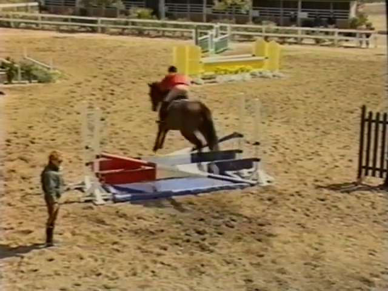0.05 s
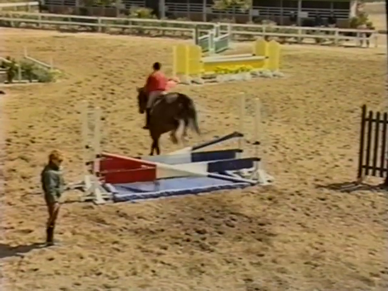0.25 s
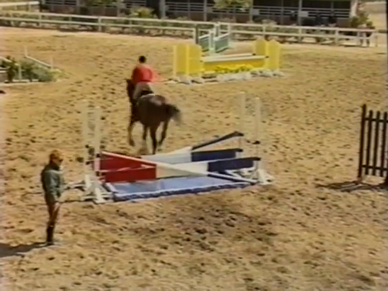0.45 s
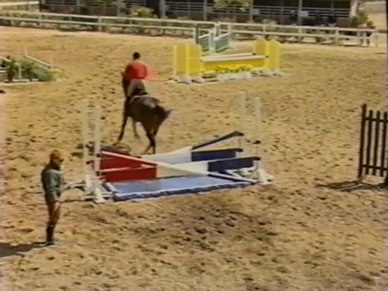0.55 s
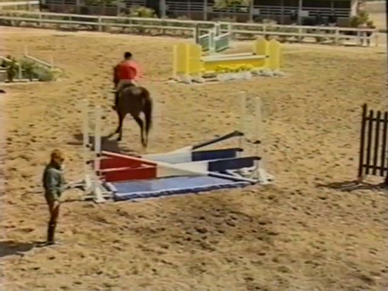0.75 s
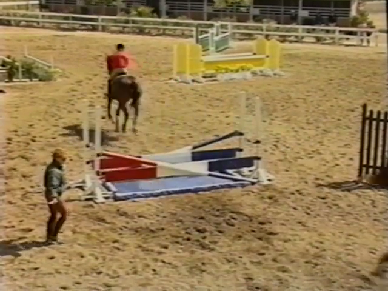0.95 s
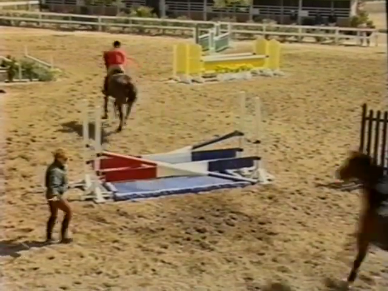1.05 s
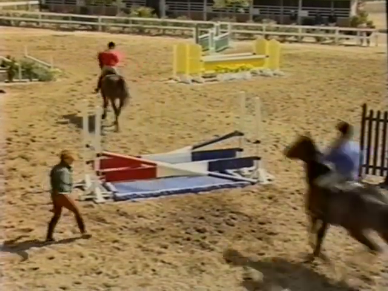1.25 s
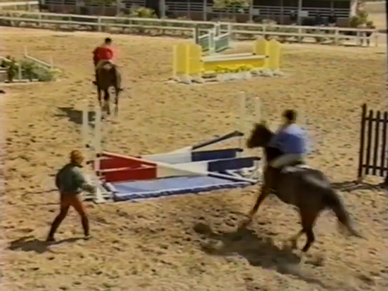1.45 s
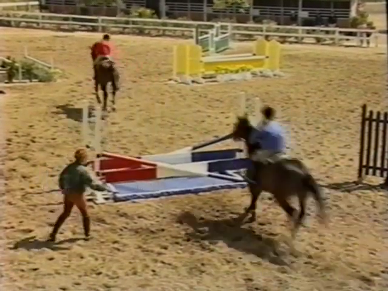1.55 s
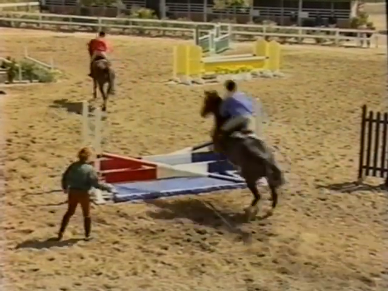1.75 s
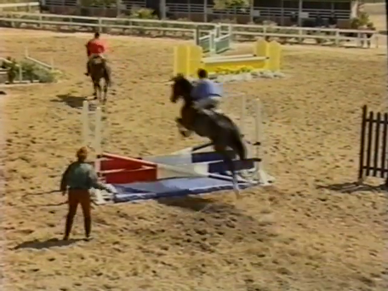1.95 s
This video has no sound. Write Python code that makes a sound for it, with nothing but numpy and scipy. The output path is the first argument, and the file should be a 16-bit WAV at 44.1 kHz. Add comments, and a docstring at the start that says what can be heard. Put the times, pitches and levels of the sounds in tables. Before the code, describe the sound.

Muffled hoofbeats on deep sand, landing and fading, then a closer, heavier canter in light wind

```python
"""Two horses on a sand arena: one lands from a jump and canters away, the other canters in close and takes off.
From the start, sand gives way in runs of dull filtered pops, over coloured-noise wind, rustle and hiss
and a thin whine of two sines. Then hooves knock and weight thumps as short decaying sine swings, while
filtered clicks make grit ticks, crust cracks and bright grains, and pops make crunches. Later, kicked-up
sand rains down twice as sparse filtered noise. The sound is almost mono."""
import sys
import numpy as np
from scipy import signal
from scipy.fft import rfft, irfft, next_fast_len
from scipy.io import wavfile

SR = 44100
rng = np.random.default_rng(int(sys.argv[2]) if len(sys.argv) > 2 else 0)


def master(y):
    """Save y as 16-bit WAV."""
    cut = np.clip(np.atleast_2d(y).T, -1, 1)
    pcm = np.round(cut * 32767)  # scale
    wavfile.write(sys.argv[1], SR, pcm.astype(np.int16))


N = 88376  # samples

# tone of the packed sand: f/Hz, density/dB per Hz (relative)
SAND_TONE = [(18, -52), (35, -7.5), (58, -3.5), (100, 4), (200, 4), (380, -2.5), (650, -12.5), (900, -28),
             (1500, -46), (3000, -69), (8000, -97.5)]
# tone of the breaking crust: f/Hz, density/dB per Hz (relative)
CRUST_TONE = [(300, -8.5), (600, -1), (920, -4.5), (1400, -22), (3000, -45), (9000, -78.5)]
# tone of bright sand grains: f/Hz, density/dB per Hz (relative)
GRAIN_COLOUR = [(1000, -21), (3000, 1), (6000, 0), (11000, -5), (15000, -15)]
# a hoof or a clod knocks on the firm base: t/s at its loudest, peak level/dB, pitch f/Hz
KNOCK_EVENTS = [(0.202, -17, 340), (0.28, -28.5, 217), (0.396, -25, 239), (0.441, -30, 204),
                (0.535, -21.5, 175), (0.588, -21.5, 290), (0.6273, -17.5, 279), (0.647, -24, 284),
                (0.663, -23, 307), (0.776, -25.5, 266), (0.795, -23, 183), (0.933, -26.5, 260),
                (0.946, -28, 250), (0.974, -34, 192), (1.195, -32, 225), (1.315, -24.5, 208),
                (1.361, -30, 190), (1.395, -22.5, 246), (1.447, -26, 197), (1.470, -21, 310),
                (1.501, -18, 347), (1.51, -26, 377), (1.538, -15, 187), (1.568, -15, 254),
                (1.626, -26, 326), (1.641, -20.5, 253), (1.713, -15, 270), (1.724, -20, 372),
                (1.738, -30, 266), (1.749, -14, 154), (1.763, -22.5, 248), (1.775, -22, 184),
                (1.80, -15.5, 354), (1.817, -19, 260), (1.856, -15.5, 178), (1.863, -20, 235),
                (1.888, -24.5, 296), (1.927, -15, 294), (1.984, -21.5, 248)]


def from_db(db):
    """Decibels to an amplitude factor."""
    return 10 ** (np.asarray(db) / 20)


def rms_one(x):
    """Scale to an rms of 1."""
    return x / np.sqrt(np.mean(x ** 2) + 1e-20)


def add(out, s, sound):
    """Mix a sound in at a time in seconds, cut at the end of the scene."""
    start = max(int(s * SR), 0)
    out[start:start + len(sound)] += sound[:max(N - start, 0)]


def coloured(x, spectrum, tilt_db=0):
    """Causal (minimum-phase) filter that follows a spectrum, tilted in dB per octave."""
    size = 2 * next_fast_len(len(x))
    bin_hz = np.arange(size // 2 + 1) * SR / size
    octave = np.log2(np.maximum(bin_hz, 1))
    hz, db = np.transpose(spectrum)
    tilted_db = db + tilt_db * np.log2(hz / hz[0])
    shape_db = np.interp(octave, np.log2(hz), tilted_db)
    # folding the cepstrum onto positive time makes the filter minimum-phase
    cepstrum = irfft(np.log(from_db(shape_db)))
    cepstrum[1:size // 2] *= 2
    cepstrum[size // 2 + 1:] = 0
    response = np.exp(rfft(cepstrum))
    return irfft(rfft(x, size) * response)[:len(x)]


def noise(spectrum):
    """Steady coloured noise with an rms of 1, its filter already run in."""
    white = rng.standard_normal(N + SR // 10)
    return rms_one(coloured(white, spectrum)[-N:])


def pops(size, rate):
    """Clicks at random moments, of uneven strength and either sign; rate is per second."""
    spread_db = 1
    born = (rng.random(size) < rate / SR) * rng.choice([-1, 1], size)
    return born * from_db(spread_db * np.clip(rng.standard_normal(size), -2, 2))


def presses(rows, tone, rate, settle_s):
    """Sand gives way in uneven pops while the hoof presses, then settles exponentially."""
    rise_s = 0.0025
    out = np.zeros(N)
    t = np.arange(SR // 5) / SR
    for s, length, db, *tilt_db in rows:
        onset = np.minimum(t / rise_s, 1)
        settling = np.exp(-np.maximum(t - length, 0) / settle_s)
        weight = onset * settling
        sand = rms_one(coloured(pops(len(t), rate) * weight, tone, *tilt_db))
        # the level is that under full weight, so longer presses carry more energy
        add(out, s, from_db(db) * np.sqrt(np.mean(weight ** 2)) * sand)
    return out


def blows(rows, cycles):
    """A blow cushioned by sand: a sine swing, widest after the given cycles, that soon dies away."""
    out = np.zeros(N)
    t = np.arange(SR // 10) / SR
    for s, db, hz in rows:
        age = hz * t / cycles
        envelope = (age * np.exp(-age)) ** 3
        swing = np.sin(2 * np.pi * hz * t) * envelope
        # starts early, so the envelope peaks at the listed time
        add(out, s - cycles / hz, from_db(db) * swing / np.abs(swing).max())
    return out


def clicks(rows, tone):
    """Filtered impulses: each row gives a time in seconds and a peak level in dB."""
    out = np.zeros(N)
    click = coloured(signal.unit_impulse(SR // 20), tone)
    click /= np.abs(click).max()
    for s, db in rows:
        add(out, s, from_db(db) * click)
    return out


def footfalls():
    """Deep sand gives way under each hoof in a short run of dull pops."""
    # footfalls: t/s, length/s, level/dB, brightness tilt/dB per octave
    footfall_events = [(0.0, 0.056, -40.5, -3.5), (0.103, 0.02, -35, -4.5), (0.212, 0.021, -30.5, -1.5),
                       (0.298, 0.044, -37.5, -3), (0.478, 0.058, -34.5, -5), (0.573, 0.023, -28, -2),
                       (0.613, 0.048, -27.5, -.5), (0.675, 0.07, -43, 0), (0.773, 0.036, -29.5, -0.5),
                       (0.92, 0.075, -34, -2), (1.01, 0.11, -43.5, -2.5), (1.185, 0.02, -39.5, -2),
                       (1.309, 0.039, -36.5, -3), (1.412, 0.025, -28.5, -3.5), (1.443, 0.053, -28.5, 2.4),
                       (1.49, 0.028, -23.5, 3), (1.535, 0.061, -27, -0.5), (1.61, 0.055, -27.5, 1.5),
                       (1.718, 0.034, -26, 4.5), (1.764, 0.035, -25, 1.5), (1.808, 0.057, -29, 1.5),
                       (1.886, 0.023, -29, -.5), (1.913, 0.064, -30, -0.5)]
    return presses(footfall_events, SAND_TONE, rate=480, settle_s=0.011)


def patter():
    """Far hooves and falling clods: small dull pops at random between the footfalls."""
    level_db, pops_per_s, tilt_db_per_octave = -44, 110, -1.5
    dull_pops = coloured(pops(N, pops_per_s), SAND_TONE, tilt_db_per_octave)
    return from_db(level_db) * rms_one(dull_pops)


def wind():
    """Light wind: low coloured noise that rises and lulls."""
    # wind tone: f/Hz, density/dB per Hz (relative)
    wind_tone = [(18, -45), (32, -38), (52, 11), (100, 4.5), (200, -16), (400, -15), (800, -16.5),
                 (1300, -31), (3000, -62.5)]
    # rise and lull of the wind: t/s, level/dB
    wind_level = [(0, -40.5), (.33, -42), (.4, -42.5), (.66, -42), (.86, -42), (1.24, -46), (1.55, -38),
                  (2, -39)]
    level_db = np.interp(np.arange(N) / SR, *np.transpose(wind_level))
    return from_db(level_db) * noise(wind_tone)


def rustle():
    """A soft rustle, as of thrown sand: faint noise with a narrow-band swell after the landing."""
    # rustle tone: f/Hz, density/dB per Hz (relative)
    rustle_tone = [(500, 3), (1000, 6), (1800, 4.5), (2400, 0.5), (3000, 1.5), (4200, -5), (8000, -12)]
    # course of the rustle: t/s, level/dB
    rustle_level = [(0, -65), (.4, -68), (.7, -65), (.95, -68), (1.25, -68.5), (1.6, -68.5), (2, -68.5)]
    # narrow tone of the swell: f/Hz, density/dB per Hz (relative)
    swell_tone = [(1000, -26), (1780, 1), (3000, -26), (6000, -45)]
    swell_at_s, swell_width_s, swell_db = 0.69, 0.15, -71.5
    t = np.arange(N) / SR
    level_db = np.interp(t, *np.transpose(rustle_level))
    bell = np.exp(-((t - swell_at_s) / swell_width_s) ** 2)
    swell = from_db(swell_db) * bell * noise(swell_tone)
    return from_db(level_db) * noise(rustle_tone) + swell


def hiss():
    """Steady coloured noise in the centre, plus faint white noise of opposite sign left and right."""
    # hiss tone: f/Hz, density/dB per Hz (relative)
    hiss_tone = [(200, 8.5), (2000, -2), (5000, 3.5), (7200, 8), (9000, 3), (15500, 1)]
    centre_db, side_db = -74.5, -90.5
    side = from_db(side_db) * rng.standard_normal(N) * np.array([[1], [-1]])
    return from_db(centre_db) * noise(hiss_tone) + side


def whine():
    """A thin electrical whine of steady, very high sines."""
    # whine partials: f/Hz, rms level/dB
    whine_partials = [(13980, -89), (15735, -87)]
    t = np.arange(N) / SR
    return sum(np.sqrt(2) * from_db(db) * np.sin(2 * np.pi * hz * t) for hz, db in whine_partials)


def knocks():
    """Hooves and clods strike the firm base, a short pitched swing for each."""
    return blows(KNOCK_EVENTS, cycles=0.683)


def crust_cracks():
    """The crust cracks at each knock: a filtered click well under the knock's peak."""
    under_knock_db = -17.5
    return clicks([(s, db + under_knock_db) for s, db, hz in KNOCK_EVENTS], CRUST_TONE)


def grit_ticks():
    """Grit against a shoe: single dry clicks."""
    # grit ticks: t/s, peak level/dB
    tick_events = [(0.2, -52), (0.626, -36.5), (1.47, -45), (1.5, -39), (1.535, -37.5), (1.711, -42.5),
                   (1.746, -39), (1.759, -41.5), (1.799, -40), (1.855, -38.5), (1.927, -41)]
    # tone of a tick: f/Hz, density/dB per Hz (relative)
    tick_tone = [(300, -2.5), (1000, 19.5), (1800, 14), (3500, -2.5), (7000, -14.5), (15000, -28)]
    return clicks(tick_events, tick_tone)


def thumps():
    """The weight of the horse comes down: the ground swings low for a cycle or two."""
    # thumps: t/s at the loudest, peak level/dB, pitch f/Hz
    thump_events = [(0.228, -26.5, 75), (0.635, -23.5, 64), (0.805, -19.5, 115), (1.55, -24, 91),
                    (1.63, -29.5, 93), (1.76, -26, 77.3)]
    return blows(thump_events, cycles=0.84)


def crunches():
    """The crust crunches under the hoof: short runs of finer, denser pops."""
    # crunches: t/s, length/s, level/dB
    crunch_events = [(0.217, 0.019, -45), (0.586, 0.0087, -47), (0.643, 0.009, -50), (0.791, 0.0025, -40),
                     (1.496, 0.02, -36), (1.534, 0.0033, -35.5), (1.564, 0.023, -39),
                     (1.634, 0.0044, -35.5), (1.721, 0.026, -39.5), (1.765, .055, -41.5)]
    return presses(crunch_events, CRUST_TONE, rate=1800, settle_s=0.0068)


def bright_grains():
    """Single grains: clicks finer and brighter than the grit."""
    # bright grains: t/s, peak level/dB
    grain_events = [(0.483, -48), (0.835, -48.5), (1.721, -47.5), (1.978, -50)]
    return clicks(grain_events, GRAIN_COLOUR)


def sprays():
    """Kicked-up sand rains down: sparse random grains that swell and fade."""
    # sprays: t/s, length/s, level/dB
    spray_events = [(0.877, 0.1, -71.5), (1.541, .1, -72)]
    grains_per_s = 2200
    out = np.zeros(N)
    t = np.arange(SR // 4) / SR
    for s, length, db in spray_events:
        landed = rng.random(len(t)) < grains_per_s / SR
        grains = landed * rng.standard_normal(len(t))
        swell_and_fade = np.sin(np.pi * np.minimum(t / length, 1))
        add(out, s, from_db(db) * swell_and_fade * rms_one(coloured(grains, GRAIN_COLOUR)))
    return out


def scene():
    """Hooves, sand and air almost in the centre, over the hiss and whine."""
    # stereo balance: one row each for left and right, level/dB
    balance_db = [
        [-.06],
        [.06],
    ]
    hooves = footfalls() + patter() + knocks() + thumps() + crunches()
    grit = crust_cracks() + grit_ticks() + bright_grains() + sprays()
    arena = hooves + grit + wind() + rustle()
    return arena * from_db(balance_db) + hiss() + whine()


def record(dry):
    """The deepest bass is rolled off and the top is cut steeply."""
    low_cut_hz, cutoff_hz = 14, 15900
    low_cut = signal.butter(2, low_cut_hz, "high", fs=SR, output="sos")
    # 0.1 dB passband ripple, 80 dB stopband rejection
    top_cut = signal.ellip(12, .1, 80, cutoff_hz, fs=SR, output="sos")
    return signal.sosfilt(top_cut, signal.sosfilt(low_cut, dry))


dry = scene()
out = record(dry)
master(out)
```